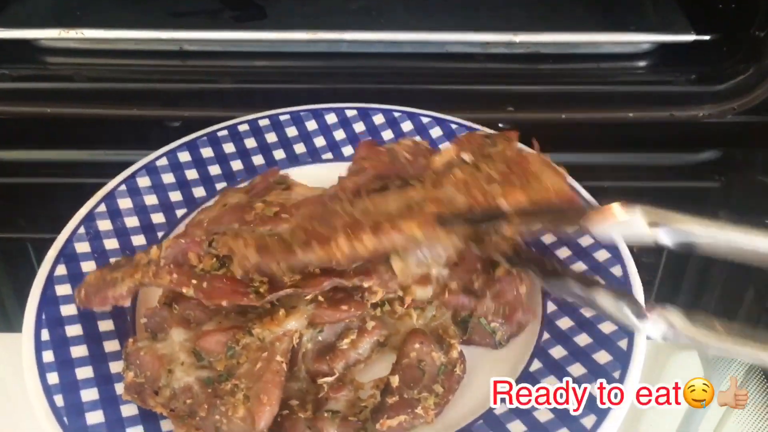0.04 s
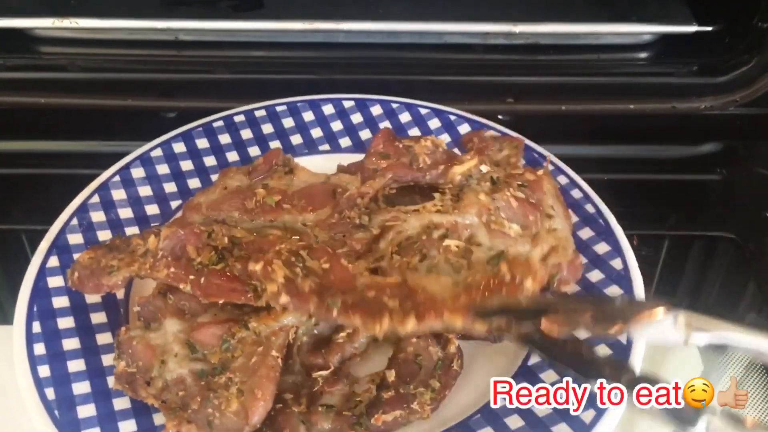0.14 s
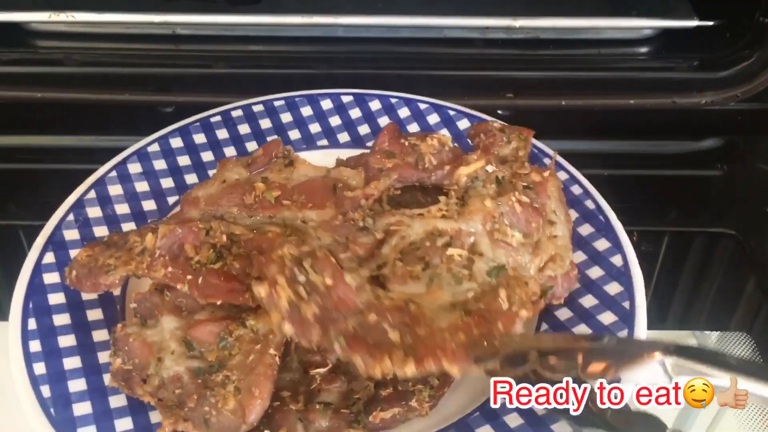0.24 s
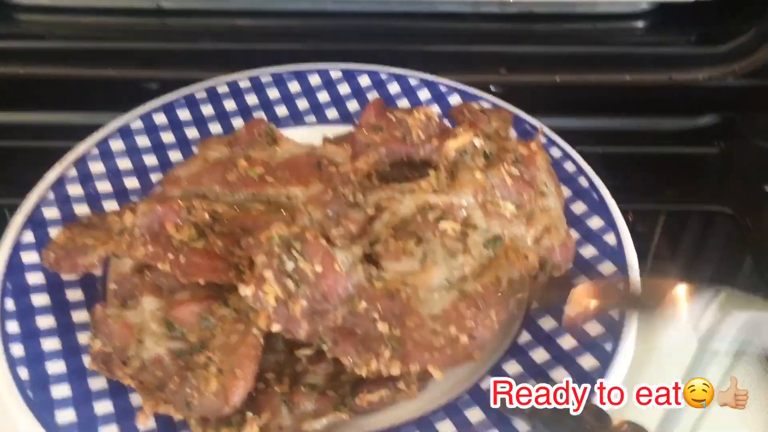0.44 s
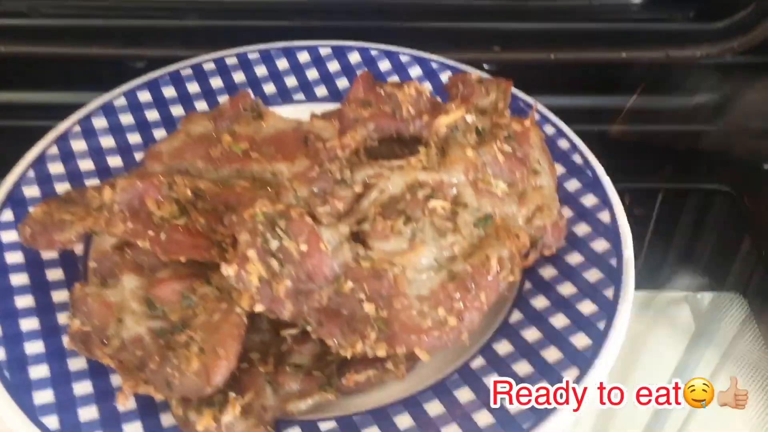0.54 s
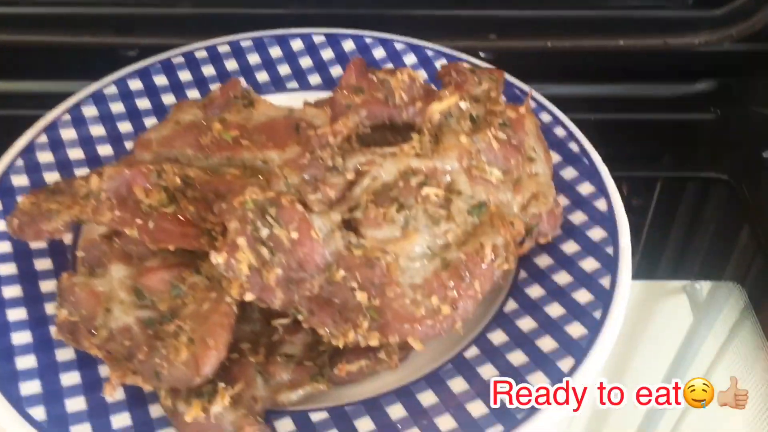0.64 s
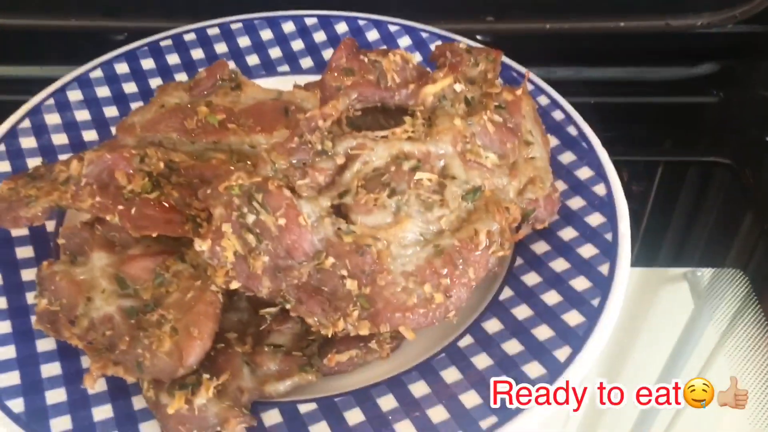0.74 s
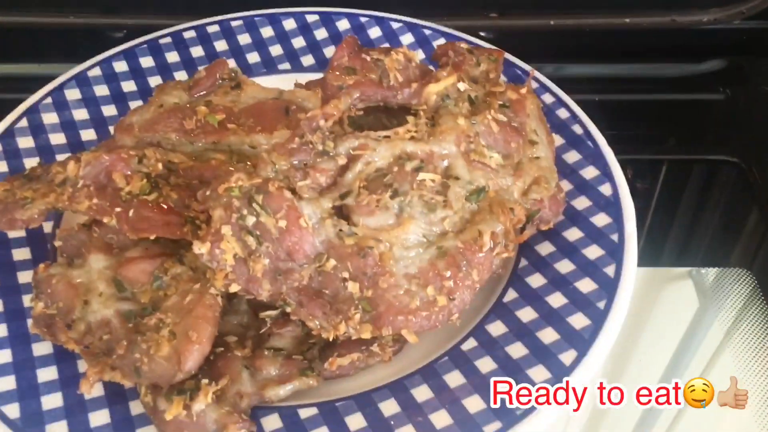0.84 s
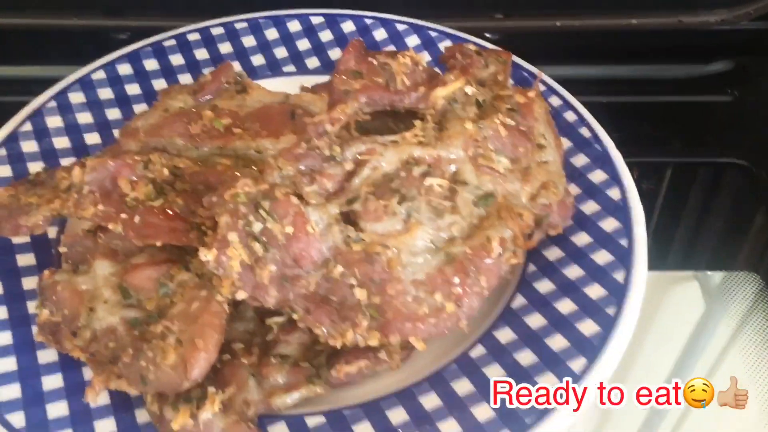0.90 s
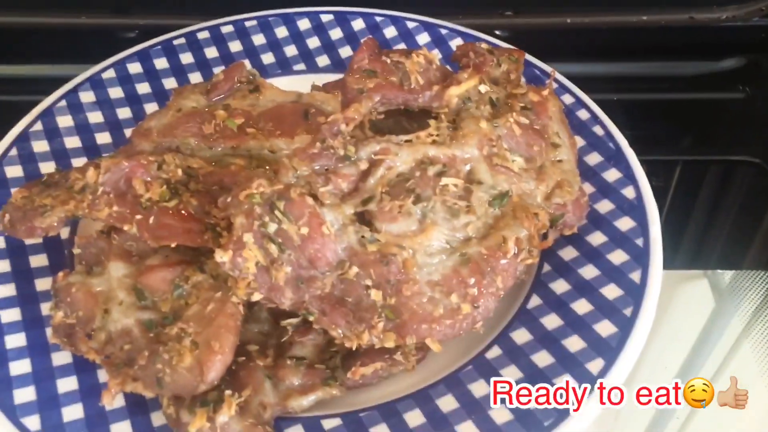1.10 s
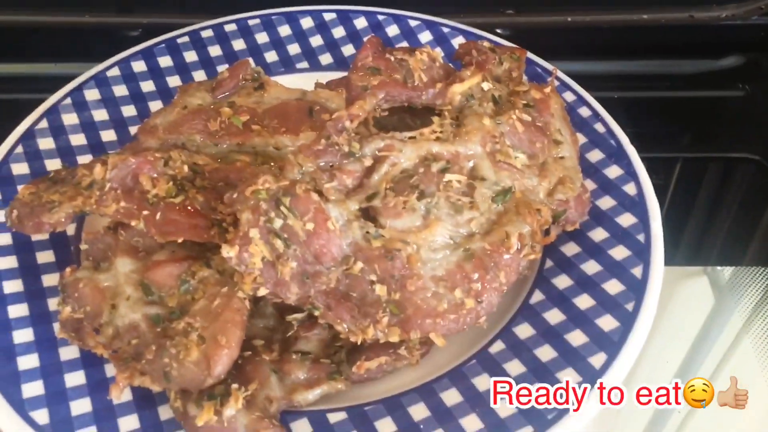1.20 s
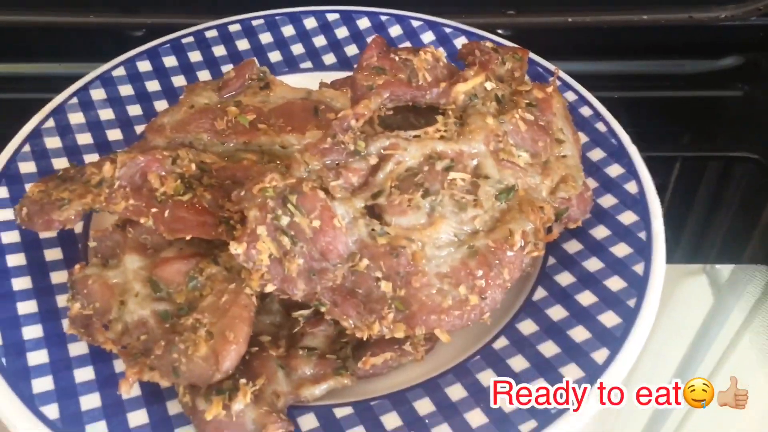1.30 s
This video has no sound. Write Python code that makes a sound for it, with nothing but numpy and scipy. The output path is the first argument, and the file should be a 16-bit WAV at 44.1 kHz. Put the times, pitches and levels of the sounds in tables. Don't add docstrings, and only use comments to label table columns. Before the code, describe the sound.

Metal tongs strike a ceramic plate in a quick double clack with a short rattle, early on, after light ticks and a slight slide; a quiet oven fan hums throughout, close up, with short kitchen echo.

```python
import sys
import numpy as np
from scipy import signal
from scipy.fft import rfft, irfft
from scipy.io import wavfile

SR = 44100
rng = np.random.default_rng(int(sys.argv[2]) if len(sys.argv) > 2 else 0)


def transcribe(signal):
    frames = np.atleast_2d(signal).T
    limited = np.clip(frames, -1, 1)
    pcm = np.round(limited * 32767).astype(np.int16)
    wavfile.write(sys.argv[1], SR, pcm)


def elevation(decibels):
    levels = np.asarray(decibels, float)
    return 10 ** (levels / 20)


N = 59535


def rms_one(x):
    return x / np.sqrt(np.mean(x ** 2) + 1e-20)


def at_hz(points, hz, axis=1):
    table = np.array(points)
    return np.interp(np.log(hz), np.log(table[:, 0]), table[:, axis])


def drift(rate):
    r = np.exp(-80 * np.pi * rate / SR)
    noise = rng.standard_normal(N // 40 + 2002)
    slow = rms_one(signal.lfilter([1], [1, -2 * r, r * r], noise)[2000:])
    return np.interp(np.arange(N) / 40, np.arange(len(slow)), slow)


def resonate(x, hz, width):
    r = np.exp(-np.pi * width / SR)
    gain = (1 - r * r) / 2
    return signal.lfilter([gain, 0, -gain], [1, -2 * r * np.cos(2 * np.pi * hz / SR), r * r], x)


def coloured(spectrum, patchy_db):
    hz = np.maximum(np.fft.rfftfreq(N, 1 / SR), 1)
    inside = (hz > spectrum[0][0]) & (hz < spectrum[-1][0])
    whole = rfft(rng.standard_normal(N)) * elevation(at_hz(spectrum, hz)) * inside
    band = np.floor(3 * np.log2(hz))
    together = drift(2.5)
    total = np.zeros(N)
    for k in range(13, 41):
        flicker = elevation(patchy_db * (0.2 * together + drift(28)))
        total += irfft(whole * (band == k), N) * flicker
    return rms_one(total)


# f/Hz, level/dB per Hz
RUMBLE = [(15, -48.5), (25, -17.5), (70, -15.5), (108, -1), (198, -12.5), (259, -24.5), (305, -15.5),
          (329, -25.5), (520, -51), (680, -46), (1140, -120)]
# f/Hz, level/dB per Hz
AIR_HISS = [(260, -24), (450, -3.5), (1190, -8), (1310, -9), (1420, -9.5), (2500, -11), (3470, -20.5),
            (7960, -16), (10500, -17), (13600, -56), (22000, -120)]
# f/Hz, width/Hz, level/dB
MOTOR_TONES = [(52, 18, -67.5), (96.68, 18, -57), (118.13, 3.9, -57.5), (143.02, 6, -64),
               (237.86, 6.4, -65.5), (302.6, 2.3, -63.5), (390.9, 8, -71.5), (595, 28, -80), (798, 8, -80),
               (1080.4, 30, -79), (1290, 18, -80)]


def fan():
    rumble = elevation(-45.5) * coloured(RUMBLE, patchy_db=1.0)
    hiss = elevation(-64) * coloured(AIR_HISS, patchy_db=0.4)
    tones = np.zeros(N)
    for hz, width, db in MOTOR_TONES:
        noise = rng.standard_normal(N + SR)
        tone = resonate(resonate(noise, hz, width), hz, width)[SR:]
        tones += elevation(db) * rms_one(tone)
    return rumble + hiss + tones


# t/s, level/dB
SLIDE_LEVEL = [
    (0, -60),
    (.05, -70),
    (.14, -65.5),
    (.172, -62),
    (.18, -51.5),
    (0.206, -46.5),
    (.215, -63),
    (.225, -83),
]


def slide():
    catches_per_s, pitch_hz, sharpness_q = 5500, 7000, 0.4
    sizes = elevation(3 * rng.exponential(1, N).clip(0, 2.5)) * rng.choice([-1, 1], N)
    catches = sizes * (rng.random(N) < catches_per_s / SR)
    s, db = np.transpose(SLIDE_LEVEL)
    level = elevation(np.interp(np.arange(N) / SR, s, db, right=-120) + 1.5 * drift(60))
    return level * rms_one(resonate(catches, pitch_hz, pitch_hz / sharpness_q))


def chatter(decay_s):
    clicks_per_s, level_db = 4500, -9
    t = np.arange(SR // 4) / SR
    sizes = elevation(level_db + 3.2 * rng.exponential(1, len(t)).clip(0, 2)) * rng.choice([-1, 1], len(t))
    happens = (rng.random(len(t)) < clicks_per_s / SR) * (t > 0.0007)
    clicks = sizes * happens * np.exp(-t / decay_s)
    clicks[0] = 1
    return clicks


def ring(clicks, modes):
    spread_db, split = 1.5, 0.015
    t = np.arange(len(clicks)) / SR
    draws = rng.standard_normal((len(modes), 2)).clip(-2, 2)
    body = np.zeros(len(t))
    for (hz, db, t60), (a, b) in zip(modes, draws):
        main = np.sin(2 * np.pi * hz * t)
        twin = np.sin(2 * np.pi * hz * (1 + split * b) * t)
        twin *= 0.391 * elevation(-30 * t / t60)
        body += elevation(db + spread_db * a - 60 * t / t60) * (main - twin)
    return signal.fftconvolve(clicks, body)[:len(clicks)]


# f/Hz, level/dB, t60/s (time to fall by 60 dB)
STEEL_MODES = [(4304, -18.5, 0.014), (5184, -22.5, 0.039), (5537, -19.5, 0.023), (5990, -40, .05),
               (6372, -23, 0.045), (6392, -23, 0.056), (6863, -19, 0.0575), (7230, -15.5, 0.0493),
               (7364, -32.5, 0.11), (8330, -25.5, .06), (9100, -14.5, 0.012), (8230, -7, 0.022),
               (9165, -14, 0.044), (9792, 1, 0.024)]


def contact(db, crack_hz, chatter_s, sharp):
    clicks, width = chatter(chatter_s), crack_hz / sharp
    crack = resonate(resonate(clicks, crack_hz, width), crack_hz, 2 * width)
    first = resonate(resonate(clicks[:26], crack_hz, width), crack_hz, 2 * width)
    steel = elevation(-25) * resonate(ring(clicks, STEEL_MODES), crack_hz, 2 * width)
    return elevation(db) * (crack / np.abs(first).max() + steel)


def play(make, rows):
    out = np.zeros(N + SR)
    for s, *how in rows:
        sound, start = make(*how), int(s * SR)
        out[start:start + len(sound)] += sound
    return out[:N]


# t/s, peak level/dB, crack f/Hz, chatter decay/s
FAINT_TICKS = [(.0015, -47, 6500, 0.002), (.012, -50.5, 3990, 0.0018), (0.031, -44.5, 7960, 0.0071),
               (0.039, -47, 6000, 0.00214), (.101, -49, 4820, 0.00166), (0.1471, -39, 7000, 0.0013),
               (0.169, -41, 5020, 0.00086), (0.1776, -40.5, 5300, 0.0022), (.186, -41, 5300, 0.0016),
               (0.195, -42, 7500, .004), (.6135, -49.5, 5550, 0.0039), (0.942, -65, 4280, 0.0018),
               (1.061, -46, 7910, .004), (1.091, -43.5, 6500, 0.00174)]
# t/s, peak level/dB, crack f/Hz, chatter decay/s, sharpness/Q
HARD_KNOCKS = [(.2140, -5.5, 7890, 0.00402, 3.05), (.2150, -25.5, 3290, 0.0095, 1.313),
               (.2280, -30.5, 7300, 0.032, 2), (.2495, -19.5, 6800, 0.0053, 2.2),
               (.2525, -30, 7350, .003, 0.96), (0.2632, -8.5, 7470, 0.006, 2.4),
               (0.268, -18, 7000, 0.0074, 3.5), (0.2687, -15, 7900, 0.0067, 3),
               (.2690, -27.5, 4088, 0.0037, 4.5), (0.276, -23, 6670, 0.0032, 3),
               (0.2811, -17.5, 7570, .005, 2.7), (0.286, -28, 6380, 0.0033, 5.8),
               (0.3004, -19.5, 6180, 0.0034, 4.5), (.3040, -27, 8500, 0.0074, 2.2),
               (.2850, -27.5, 3106, 0.0093, 1.215), (0.3409, -34, 6100, 0.0024, 4.4),
               (0.346, -28.5, 8650, 0.0061, 3.5), (1.2474, -45.5, 6000, 0.0078, 4.5),
               (1.2477, -53, 2915, 0.0064, 4.5), (1.26, -39, 6026, 0.00597, 4.54),
               (1.2592, -46, 3120, 0.006, 1.76), (1.2588, -42, 9000, 0.0041, 3.36)]


def tongs():
    ticks = [(*tick, 1.9) for tick in FAINT_TICKS]
    return play(contact, HARD_KNOCKS + ticks)


# f/Hz, level/dB, t60/s
PLATE_MODES = [(347, -20.5, .08), (368.7, -18, .09), (411.2, -10.5, 0.078), (436.5, -16, .09),
               (648.4, -23.5, 0.055), (914.7, -24, .08), (1027.8, -19.5, 0.094), (2028, -17.5, .05),
               (2210.4, -22, 0.03), (2704, -28.5, 0.0482), (2862, -25.5, 0.031), (3380, -24.5, .05),
               (3660, -18, 0.0928), (3835, -26.5, .06)]


def thud(db, centre_hz, fall_db):
    longest_ring_s, body_db, body_s, body_q = 0.11, -1.5, 0.0055, 2.2
    modes = []
    for hz, level, t60 in PLATE_MODES:
        octaves_away = abs(np.log2(hz / centre_hz))
        modes.append((hz, level - fall_db * octaves_away, min(t60, longest_ring_s)))
    t = np.arange(SR // 4) / SR
    burst = rng.standard_normal(len(t)) * np.exp(-t / body_s)
    body = resonate(burst, centre_hz, centre_hz / body_q)
    return elevation(db) * (ring(chatter(0.0017), modes) + elevation(body_db) * body)


# t/s, level/dB, centre f/Hz, fall away from it/dB per octave (negative: rise)
PLATE_THUDS = [
    (.2145, -28, 409, -2.5),
    (.2145, -26, 2600, 0.5),
    (.2635, -27.5, 990, 3),
    (.265, -32.5, 2390, -1),
    (.2800, -31.5, 344, -3.5),
    (.283, -38.5, 2610, 5),
    (.318, -33, 429, 2),
    (.208, -45, 2200, 2.5),
    (0.45, -67.5, 2500, 10),
    (1.091, -54, 2500, 0),
]


def plate():
    return play(thud, PLATE_THUDS)


# f/Hz, level/dB, t60/s
RIM_MODES = [(1365, -38, 0.0984), (1564, -43, 0.0474), (2002, -38.5, 0.042), (2696, -44, 0.085),
             (3423, -49.5, 0.063)]


def rim():
    click = np.zeros(N)
    click[int(0.3016 * SR)] = 1
    return ring(click, RIM_MODES)


# f/Hz, level/dB
ECHO_LEVEL = [(300, -12.5), (700, -26.5), (1500, -16), (3000, -20.5), (5000, -23.5), (7500, -29.5),
              (9500, -18)]
# f/Hz, t60/s
ECHO_T60 = [(300, .5), (1500, .55), (4000, .58), (7000, .46), (9500, .46)]


def kitchen(x):
    t = np.arange(SR) / SR
    hz = np.maximum(np.fft.rfftfreq(SR, 1 / SR), 1)
    white, band = rfft(rng.standard_normal(SR)), np.floor(2 * np.log2(hz))
    tail = np.zeros(SR)
    for k in range(15, 28):
        pitch = 2 ** (k / 2)
        level = at_hz(ECHO_LEVEL, pitch) - 60 * t / at_hz(ECHO_T60, pitch)
        tail += irfft(white * (band == k), SR) * elevation(level)
    fade_in = np.clip(t / 0.006 - 0.3, 0, 1)
    return signal.fftconvolve(x, tail * fade_in * elevation(-20))[:N]


def scene():
    near = slide() + tongs() + plate() + rim()
    return (fan() + near + kitchen(near))[None]


def band_limit(x):
    return signal.sosfilt(signal.butter(12, 10960, fs=SR, output="sos"), x)


def record(dry):
    top_cut = signal.cheby1(6, 0.3, 9515, fs=SR, output="sos")
    bass_cut = signal.butter(2, 48.5, "high", fs=SR, output="sos")
    cut = signal.sosfiltfilt(top_cut, dry)
    cut = signal.sosfilt(bass_cut, cut)
    mix = cut + elevation(-105) * rng.standard_normal(dry.shape)
    return band_limit(mix)


dry = scene()
out = record(dry)
transcribe(out)
```